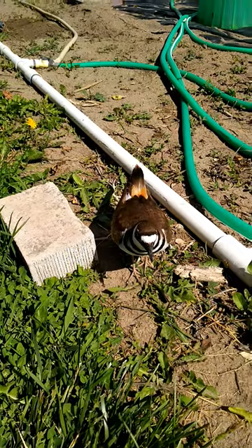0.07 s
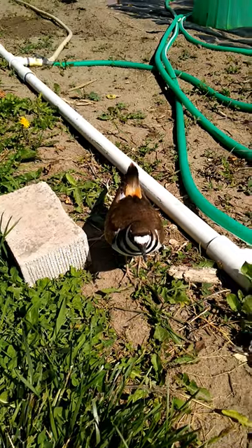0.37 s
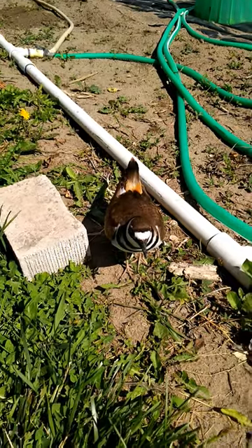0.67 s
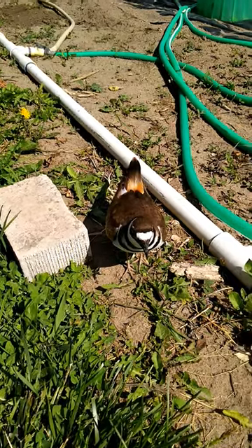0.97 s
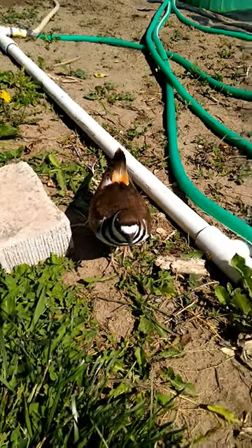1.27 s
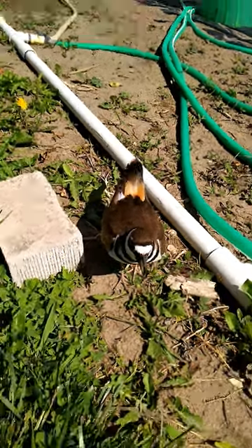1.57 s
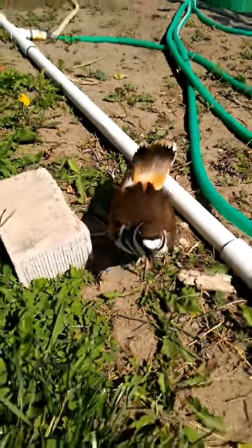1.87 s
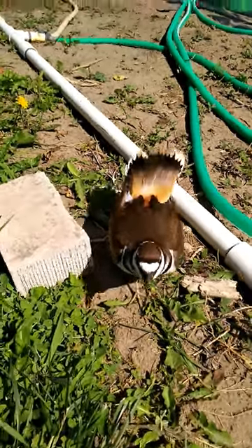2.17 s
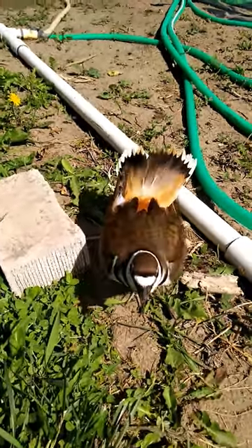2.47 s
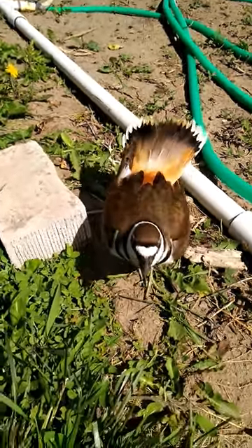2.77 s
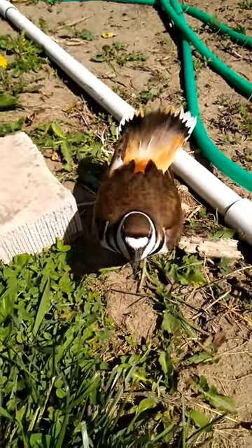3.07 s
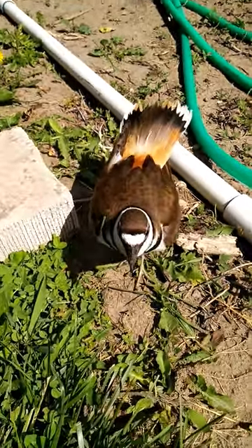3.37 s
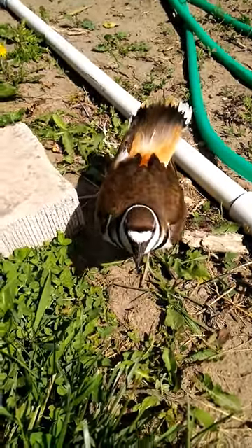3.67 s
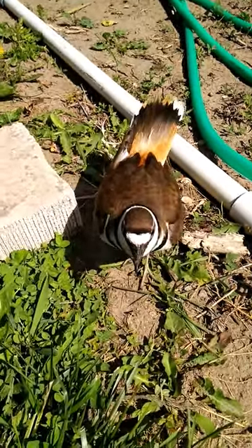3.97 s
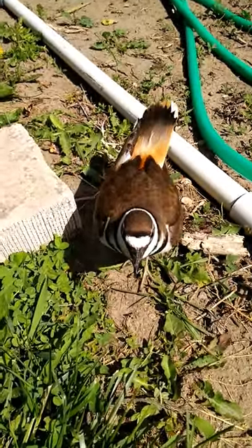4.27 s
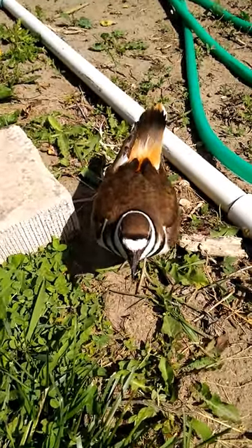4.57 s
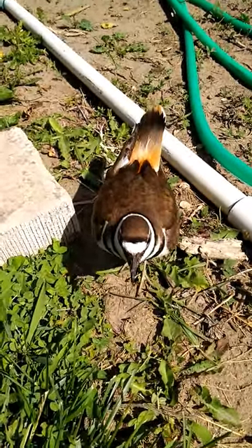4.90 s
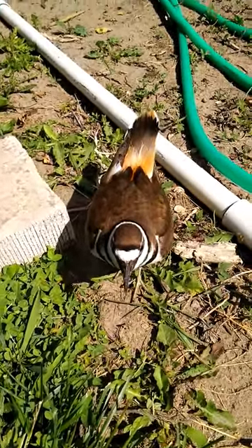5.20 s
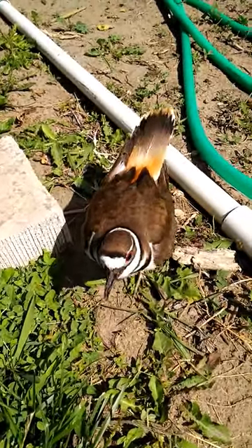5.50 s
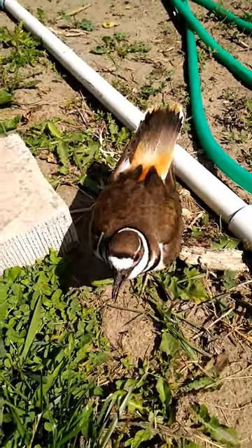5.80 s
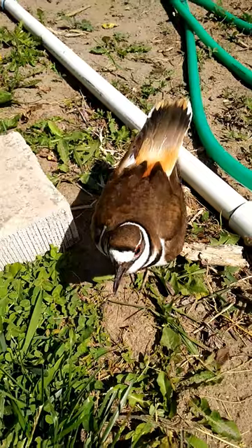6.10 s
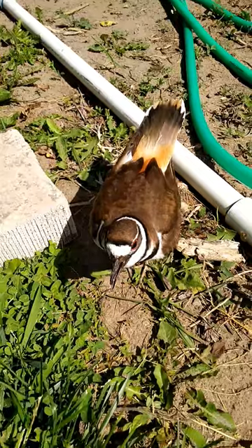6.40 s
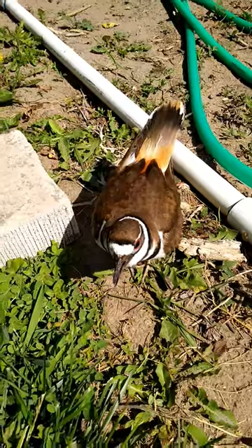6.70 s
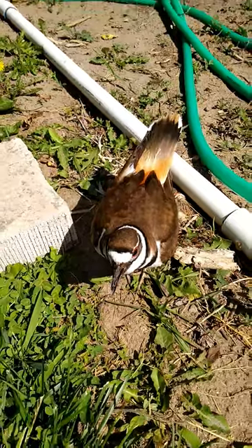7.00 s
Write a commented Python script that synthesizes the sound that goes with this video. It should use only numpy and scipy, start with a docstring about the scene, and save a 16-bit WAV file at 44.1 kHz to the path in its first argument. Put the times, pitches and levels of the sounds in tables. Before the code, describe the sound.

Two high, whistled bird calls lead into a fast, steady trill of short notes, outdoors over a faint wind rumble.

```python
"""Light wind rumbles on the microphone. A killdeer close by gives two drawn-out calls, then a long trill
of about nine notes a second: a whistle strongest on its second harmonic, with a tiny tick as the airway
pops open before each note. Early in the trill it squeaks once and a second vibration turns it raspy.
From the trill's start a songbird whistles far off. The yard returns a faint echo throughout."""
import sys
import numpy as np
from scipy import signal
from scipy.fft import rfft, irfft, next_fast_len
from scipy.io import wavfile
from scipy.ndimage import uniform_filter1d

SR = 44100
rng = np.random.default_rng(int(sys.argv[2]) if len(sys.argv) > 2 else 0)


def pcm_store(signal):
    """Save signal as 16-bit PCM."""
    levels = np.round(np.clip(np.atleast_2d(signal), -1, 1) * 32767)
    wavfile.write(sys.argv[1], SR, levels.astype(np.int16).T)


N = 310905
TIME = np.arange(N) / SR


def gain_of(db):
    """Decibels to amplitude."""
    return 10 ** (np.asarray(db) / 20)


def unit_rms(x):
    """Scale to rms 1."""
    return x / np.sqrt(np.mean(x ** 2) + 1e-20)


def at_hz(table, hz):
    """Table lookup on a log-frequency axis."""
    freq_hz, value = np.transpose(table)
    return np.interp(np.log(hz + 1), np.log(freq_hz + 1), value)


def add(mix, start_s, sound):
    """Mix a sound in at start_s."""
    part = mix[max(round(start_s * SR), 0):][:len(sound)]
    part += sound[:len(part)]


def noise(spectrum):
    """Shaped noise, rms 1."""
    size = next_fast_len(N)
    shape = gain_of(at_hz(spectrum, np.fft.rfftfreq(size, 1 / SR)))
    return unit_rms(irfft(rfft(rng.standard_normal(size)) * shape, size)[:N])


def lowpass(x, cutoff_hz):
    """Second-order low-pass."""
    return signal.sosfilt(signal.butter(2, cutoff_hz, fs=SR, output="sos"), x)


def wander(rate_hz):
    """Random drift up to rate_hz, rms 1."""
    return unit_rms(lowpass(rng.standard_normal(N), rate_hz))


def gate(t, attack_s=0.0016, release_s=0.0049):
    """Fast onset and closure of the voice."""
    attack = np.sin(np.pi / 2 * np.clip((t - t[0]) / attack_s, 0, 1)) ** 2
    return attack * np.clip((t[-1] - t) / release_s, 0, 1)


# Throat and bill response: freq_hz, gain_db
TRACT_RESPONSE = [(2000, -17.5), (2300, -18.5), (3900, 0), (4450, -2.5), (5700, -13.5), (6300, -15),
                  (7800, -23), (8500, -16.5), (10300, -26), (11500, -23.5), (12200, -18.5), (13200, -29.5),
                  (14300, -40), (15500, -34.5)]
# Harmonics 1-7: gain_db_per_brightness_db
BRIGHTNESS_SLOPES = [0.68, 0.18, 1.31, 1.4, 1.3, 1.2, .9]
# Raspy stretches: start_s, end_s, depth_ratio
RASPS = [(1.984, 2.04, 0.17), (2.11, 2.148, 0.51), (2.206, 2.263, 0.6), (2.311, 2.39, 0.54),
         (2.454, 2.475, 0.74), (2.545, 2.604, 0.52), (2.672, 2.686, 0.65), (5.231, 5.28, 0.15)]
# Throat turbulence: freq_hz, relative_db
THROAT_SPECTRUM = [(500, -44.5), (1400, -21), (2200, -3), (2750, -6.5), (3200, -6), (4200, -20), (4900, -2),
                   (5500, 5), (6100, -4), (6900, -8), (7500, 1), (8700, -14), (10500, -11.5),
                   (12500, -31.5), (15500, -39)]


def killdeer(notes, wobble_hz=4, flutter_hz=440, buzz_hz=600, ring_hz=5500):
    """Harmonic whistle; in rasps a second vibration shakes phase and level and chops the air into puffs."""
    pitch_hz, level, bright_db, rasp, onset = np.zeros((5, N))
    for start_s, *curves in notes:
        for track, curve in zip((pitch_hz, level, bright_db), curves):
            add(track, start_s, curve)
        add(onset, start_s, np.exp(-TIME[:SR // 20] / .002))  # irregular first cycles
    for start_s, end_s, depth in RASPS:
        add(rasp, start_s, depth * signal.windows.tukey(round((end_s - start_s) * SR), .5))
    in_trill = TIME > TRILL_NOTES[0][0]
    flutter_rad = 2 * np.pi * np.cumsum(flutter_hz * (1 + .14 * wander(250))) / SR
    phase_rad = 2 * np.pi * np.cumsum(pitch_hz * (1 + .001 * wander(400))) / SR
    phase_rad += 2 * np.pi * np.cumsum(wobble_hz * wander(45)) / SR
    phase_rad += 0.18 * rasp * np.sin(flutter_rad)
    buzz_depth = 0.1 * gain_of(.3 * bright_db) * in_trill
    buzz = buzz_depth * np.cos(2 * np.pi * buzz_hz * TIME + .5 * wander(160))
    voice = np.zeros(N)
    for k, slope in enumerate(BRIGHTNESS_SLOPES, 1):
        upper = k > 2  # least steady harmonics
        lopsided = np.cos(flutter_rad - k) + .5 * np.cos(2 * (flutter_rad - k))
        throb = 0.0105 * k * np.cos(flutter_rad)
        modulation = 1 + rasp * (lopsided if upper else throb)
        if k in (3, 4):
            modulation += buzz
        if k == 1:
            modulation *= 1 - onset  # fundamental settles last
        shimmer_db = (1.0 if upper else .25) * wander(45)
        harmonic_db = at_hz(TRACT_RESPONSE, k * pitch_hz) + slope * bright_db + shimmer_db
        voice += np.sqrt(2) * gain_of(harmonic_db) * modulation * np.sin(k * phase_rad)
    throat_ring = np.sin(2 * np.pi * ring_hz * TIME + wander(120)) * (1 + 0.54 * wander(200))
    voice += gain_of(-35 + .5 * bright_db) * in_trill * throat_ring
    hiss = gain_of(-44 + .5 * bright_db)
    puffs = gain_of(-23) * rasp * (1 + np.cos(flutter_rad))
    spit = gain_of(-13) * onset
    return level * (voice + noise(THROAT_SPECTRUM) * (hiss + puffs + spit))


# Call contours: time_s, pitch_hz, level_db, brightness_db
FIRST_CALL = [(.826, 2030, -17, -7.5), (.831, 2146, -8, -0.5), (.841, 2190, -8, 0.5), (.858, 2045, -10, -6),
              (.878, 1995, -12.5, -5), (.955, 2100, -9, -3.5), (.997, 2212, -9.5, 0.5),
              (1.012, 2172, -10, 0), (1.024, 2068, -15.5, -5)]
SECOND_CALL = [(1.541, 2110, -12, -6), (1.553, 2230, -11.5, 7), (1.57, 2140, -13, -0.5),
               (1.585, 2100, -9, -2), (1.61, 2114, -10, -3), (1.635, 2210, -13, 5.5),
               (1.68, 2215, -10.5, 4.5), (1.692, 2128, -8.5, -5), (1.703, 1954, -12.5, -1.5)]


def long_call(contour):
    """Start time and smoothed pitch, level and brightness curves of a drawn-out call."""
    time_s, *columns = np.transpose(contour)
    t = np.arange(time_s[0] - .001, time_s[-1] + 0.0015, 1 / SR)
    curves = [np.interp(t, time_s, column) for column in columns]
    pitch_hz, level_db, bright_db = uniform_filter1d(curves, size=160, mode="nearest")
    return t[0], pitch_hz, gain_of(level_db) * gate(t), bright_db


# Trill notes: start_s, length_s, pitch_hz, sag_hz
TRILL_NOTES = [(1.7639, 0.058, 2139, -7.5), (1.867, 0.072, 2181, 35.5), (1.987, 0.06, 2129, 19),
               (2.089, 0.066, 2154, 46.5), (2.2011, 0.067, 2165, 64), (2.3102, 0.07, 2187, 67.5),
               (2.425, 0.062, 2141, 29.5), (2.533, 0.074, 2137, 30), (2.6486, 0.057, 2118, 3.5),
               (2.7512, 0.081, 2118, 64.5), (2.873, 0.062, 2100, -7.5), (2.9786, 0.069, 2097, 18),
               (3.0902, 0.054, 2089, -9), (3.1887, 0.057, 2067, -13.5), (3.2929, 0.056, 2066, -2),
               (3.3972, 0.058, 2053, -16.5), (3.5033, 0.061, 2073, -8.5), (3.609, 0.069, 2065, -6),
               (3.7233, 0.061, 2049, 4.5), (3.8292, 0.06, 2028, 3.5), (3.9358, 0.057, 2031, -3),
               (4.0456, 0.053, 2048, 17.5), (4.1535, 0.049, 2062, 26.5), (4.2626, 0.055, 2074, -5),
               (4.3696, 0.053, 2083, 1), (4.49, 0.048, 2085, 11.5), (4.6087, 0.052, 2087, -23.5),
               (4.7157, 0.056, 2065, -9), (4.8227, 0.049, 2031, -2), (4.9289, 0.052, 2035, 1),
               (5.031, 0.061, 2036, 3), (5.1463, 0.053, 2047, 6), (5.2521, 0.074, 2048, 28.5),
               (5.374, 0.079, 2071, 47.5), (5.501, 0.078, 2066, 53), (5.6283, 0.075, 2086, 65.5),
               (5.751, 0.063, 2070, 60), (5.8611, 0.074, 2056, 32.5), (5.9832, 0.076, 2050, 11),
               (6.1093, 0.083, 2057, 39.5), (6.2395, 0.063, 2055, 39), (6.3558, 0.058, 2044, -1.5),
               (6.4622, 0.075, 2044, 2.5), (6.5854, 0.059, 2025, -0.5), (6.6985, 0.051, 2035, 6.5),
               (6.8048, 0.054, 2021, -4.5), (6.9132, 0.064, 2037, -0.5), (7.0281, 0.053, 2030, 2)]
# Drift of the note shape: time_s, fall_hz, dome_hz, level_db, brightness_db
TRILL_DRIFT = [(1.76, 240, -28, -8.5, -2.5), (1.87, 147.5, 46, -7.5, 2.5), (2.0, 178.5, 29, -5.5, 0),
               (2.33, 169, 45, -8.5, 5.5), (2.6, 211, -26, -7, 0.5), (3.05, 15.5, -36.5, -5, -3),
               (3.6, 60, -49, -5.5, -3.5), (3.85, -9.5, -58, -6.5, -5.5), (4.199, -50, 26, -6.8, -2),
               (4.55, -86, 42, -7, -1.7), (5.001, 28.5, -48.5, -8, -3.3), (5.33, 101, -14.5, -7.5, 0.2),
               (5.52, 170, 10, -9.5, 4), (5.9, 117, -11, -10.5, 3.5), (6.398, 108, -18, -9.5, 2),
               (6.8, 86, -35, -9.5, -0.8)]


def trill_note(start_s, length_s, pitch_hz, sag_hz, scoop_hz=175, drop_hz=170, bright_db_per_hz=0.1121):
    """Start time and curves of one note: pitch scoops up as pressure builds, bends, drops as it ebbs."""
    lead_s, trail_s = 0.00044, .002
    t = np.arange(-lead_s, length_s + trail_s, 1 / SR)
    progress = t / length_s
    from_pivot = progress - .45
    time_s, *columns = np.transpose(TRILL_DRIFT)
    fall_hz, dome_hz, level_db, bright_db = (np.interp(start_s, time_s, column) for column in columns)
    building = np.exp(-t / .005)
    ebbing = np.exp(np.minimum(t - length_s, -trail_s) / .01)
    sag = np.exp(-((progress - 0.37) / .18) ** 2)
    bend_hz = -fall_hz * from_pivot - dome_hz * (2 * from_pivot) ** 2 - sag_hz * sag
    curve_hz = pitch_hz + bend_hz - scoop_hz * building - drop_hz * ebbing
    swell_db = -4.5 * np.exp(-t / 0.0083)
    release = np.sin(np.pi / 2 * np.clip((progress[-1] - progress) / .3, 0, 1)) ** 1.71
    level = gain_of(level_db + swell_db) * release * gate(t, release_s=.0005)
    colour_db = bright_db_per_hz * bend_hz - 8.5 * building + 1.5 * from_pivot
    return start_s - lead_s, curve_hz, level, bright_db + colour_db


def squeak(start_s=1.984, length_s=.008, pitch_hz=5350, level_db=-13):
    """One hard onset briefly catches a higher vibration of the voice."""
    out = np.zeros(N)
    t = np.arange(0, length_s, 1 / SR)
    add(out, start_s, gain_of(level_db) * np.hanning(len(t)) * np.sin(2 * np.pi * pitch_hz * t))
    return out


# Airway tick: freq_hz, relative_db
TICK_SPECTRUM = [(600, -19), (1150, -9.5), (1450, -12.5), (2150, 2), (2800, -10), (3600, -4), (4500, -25.5),
                 (5100, -6), (6500, -21.5), (8500, -22), (14000, -59.5)]


def ticks(note_starts_s, lead_s=0.01, length_s=0.0064, puff_hz=510, soft_until_s=1.9, lone_tick_s=.765):
    """The airway pops open ahead of each note: a rustling tick with a soft hollow puff."""
    out, crackle = np.zeros(N), noise(TICK_SPECTRUM)
    t = np.arange(0, length_s, 1 / SR)
    puff = gain_of(-44) * np.hanning(len(t)) * np.sin(2 * np.pi * puff_hz * t)
    fade = np.exp(-t / length_s) * signal.windows.tukey(len(t), .2)
    for start_s in note_starts_s:
        jitter_s, spread_db = rng.normal(0, .0006), rng.normal()
        tick = gain_of(-40) * fade * unit_rms(crackle[round(start_s * SR):][:len(t)])
        softer_db = 7 if start_s < soft_until_s else 0
        add(out, start_s - lead_s + jitter_s, gain_of(spread_db - softer_db) * (tick + puff))
    add(out, lone_tick_s, gain_of(-46) * fade * crackle[:len(t)])
    return out


# Songbird whistles: start_s, length_s, start_hz, end_hz, level_db
SONGBIRD_WHISTLES = [(1.709, 0.061, 2400, 2980, -52.5), (2.233, .08, 3240, 2850, -54),
                     (2.802, 0.097, 3090, 2630, -51), (3.323, 0.11, 2614, 3010, -51),
                     (3.442, .083, 2410, 2630, -53), (3.988, 0.11, 2304, 2834, -55),
                     (4.665, 0.08, 3010, 2370, -51), (5.296, .072, 2580, 3140, -49),
                     (5.447, 0.057, 2480, 2520, -55), (5.93, 0.097, 3550, 2740, -49.5)]


def far_songbird(waver_ratio=0.011, shimmer_db=2):
    """Gliding whistles, wavering in pitch and level."""
    out = np.zeros(N)
    waver = 1 + waver_ratio * wander(120)
    for start_s, length_s, start_hz, end_hz, level_db in SONGBIRD_WHISTLES:
        size = round(length_s * SR)
        pitch_hz = np.linspace(start_hz, end_hz, size) * waver[round(start_s * SR):][:size]
        whistle = np.sin(2 * np.pi * np.cumsum(pitch_hz) / SR)
        add(out, start_s, gain_of(level_db) * signal.windows.tukey(size, .5) * whistle)
    return out * gain_of(shimmer_db * wander(80))


# Gusts: centre_s, half_width_s, rise_db
GUSTS = [(.92, .5, 8.5), (4.4, 0.37, 4)]
# Buffets: centre_s, length_s, level_db
BUFFETS = [(0.9, .09, -37), (1.145, 0.058, -33.5), (4.191, 0.03, -31), (4.56, 0.0613, -44.5),
           (4.671, 0.038, -45)]
# Wind spectra: freq_hz, relative_db
RUMBLE_SPECTRUM = [(15, -59.5), (25, -30), (40, -3), (58, 4), (75, 2.5), (105, -1), (160, -10), (230, -18),
                   (340, -33), (700, -76)]
BUFFET_SPECTRUM = [(20, -23), (55, 9), (95, 7.5), (150, -7), (240, -15), (400, -32), (900, -54.5)]


def wind(base_db=-55.5, lumps_db=1.96):
    """Wind on the microphone: lumpy rumble, swelling in gusts, with a few short buffets."""
    gust_db = sum(rise_db * np.exp(-((TIME - centre_s) / half_width_s) ** 2)
                  for centre_s, half_width_s, rise_db in GUSTS)
    out = noise(RUMBLE_SPECTRUM) * gain_of(base_db + gust_db + lumps_db * wander(5))
    eddies = noise(BUFFET_SPECTRUM)
    for centre_s, length_s, level_db in BUFFETS:
        push = unit_rms(eddies[round(centre_s * SR):][:round(length_s * SR)])
        add(out, centre_s - length_s / 2, gain_of(level_db) * push * np.hanning(len(push)))
    return out


# Yard decay: freq_hz, t60_s
YARD_DECAY = [(300, 0.18), (2000, 0.26), (4200, 0.65), (7000, 0.33), (14000, 0.047)]


def yard_echo(sound, first_s=.004, echoes_per_s=2000):
    """Sparse echoes off plants, fences and walls; each band decays at its own rate."""
    taps = rng.standard_normal(SR) * (rng.random(SR) < echoes_per_s / SR) * (TIME[:SR] > first_s)
    freq_hz, t, bands = signal.stft(taps, SR, nperseg=256)
    decay = gain_of(-60 * t / at_hz(YARD_DECAY, freq_hz)[:, None])
    _, tail = signal.istft(bands * decay, SR)
    return signal.fftconvolve(sound, tail / np.linalg.norm(tail))[:N]


# Outdoor air: freq_hz, relative_db
AIR_SPECTRUM = [(100, 0), (350, -0.5), (600, 0.5), (950, -1.5), (1600, -6.5), (3000, -13), (7000, -10),
                (11000, -10.5), (16000, -20)]


def outdoor_air(level_db):
    """Steady faint hiss."""
    return gain_of(level_db) * noise(AIR_SPECTRUM)


def scene(reflection_s=0.018, reflection_cutoff_hz=6500):
    """Birds, echoes and wind centred; only the outdoor air has a little width."""
    notes = [long_call(FIRST_CALL), long_call(SECOND_CALL)] + [trill_note(*row) for row in TRILL_NOTES]
    bird = killdeer(notes) + squeak() + ticks([note[0] for note in notes])
    song = far_songbird()
    mid = bird + gain_of(-42) * yard_echo(bird) + song + gain_of(-10) * yard_echo(song)
    add(mid, reflection_s, gain_of(-33) * lowpass(bird, reflection_cutoff_hz))
    mid += wind() + outdoor_air(level_db=-64)
    side = outdoor_air(level_db=-85)
    return np.array([mid + side, mid - side])


def record(dry, silent_s=0.58, fade_s=0.11, wind_cut_hz=37, band_limit_hz=15900):
    """Microphone chain: silent start, fade-in, wind filter, clip, band limit."""
    faded = dry * np.clip((TIME - silent_s) / fade_s, 0, 1)
    wind_filter = signal.butter(4, wind_cut_hz, "high", fs=SR, output="sos")
    clipped = np.clip(signal.sosfilt(wind_filter, faded), -.97, .97)
    band_filter = signal.firwin(511, band_limit_hz, window=("kaiser", 9), fs=SR)
    return signal.oaconvolve(clipped, band_filter[None], "same")


dry = scene()
out = record(dry)
pcm_store(out)
```